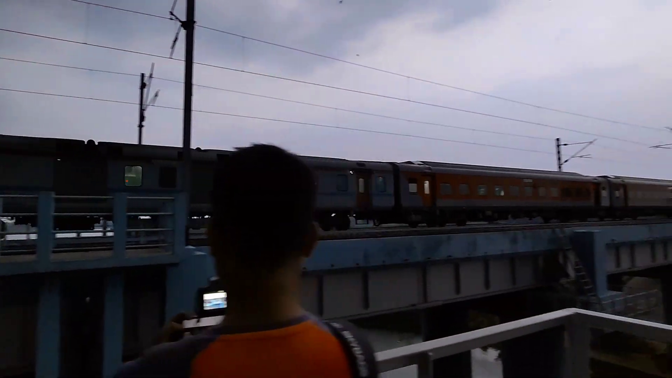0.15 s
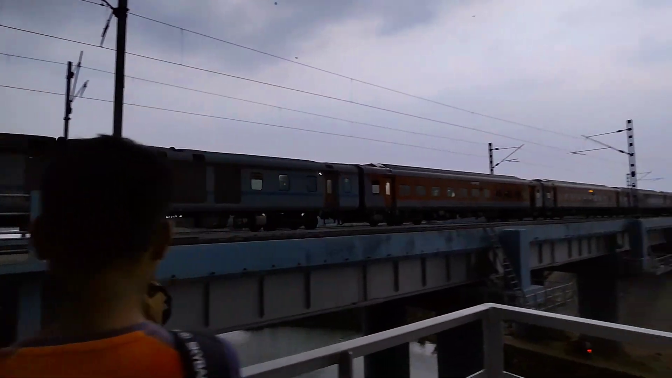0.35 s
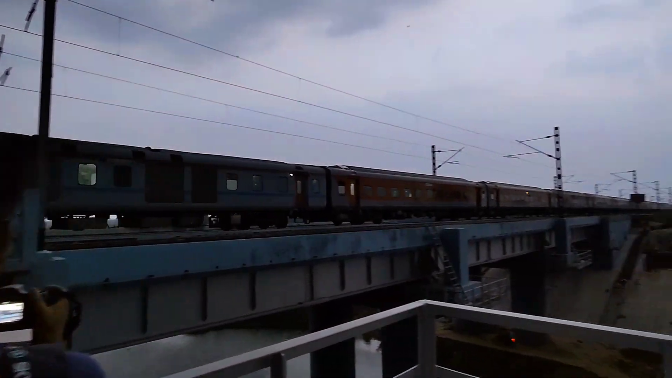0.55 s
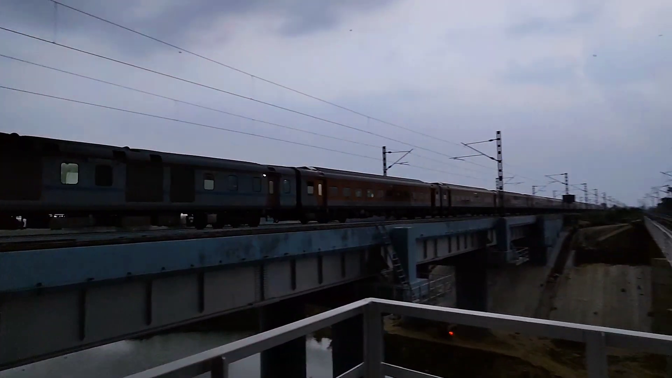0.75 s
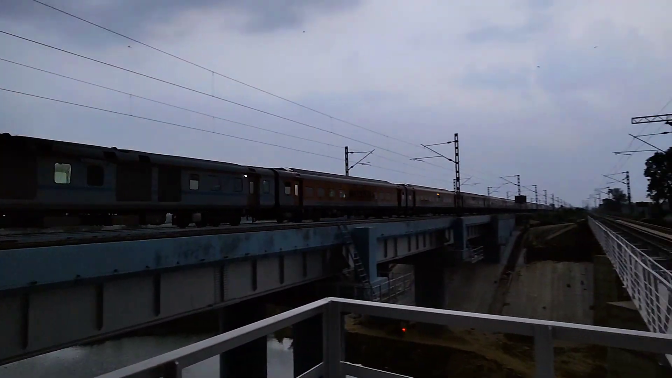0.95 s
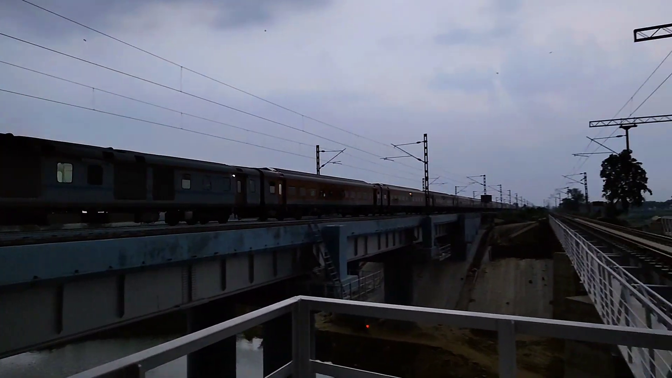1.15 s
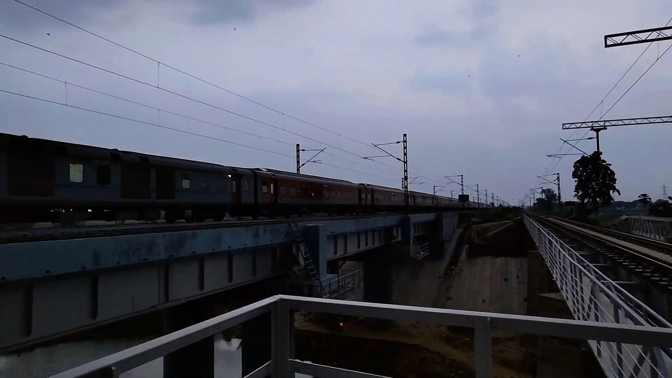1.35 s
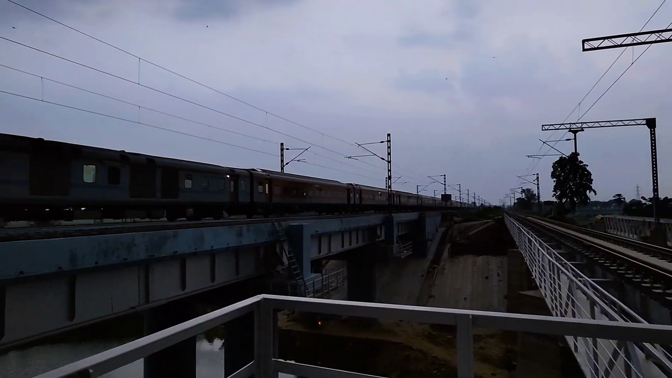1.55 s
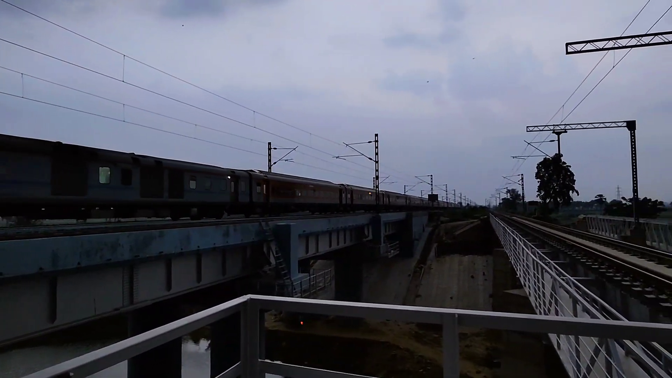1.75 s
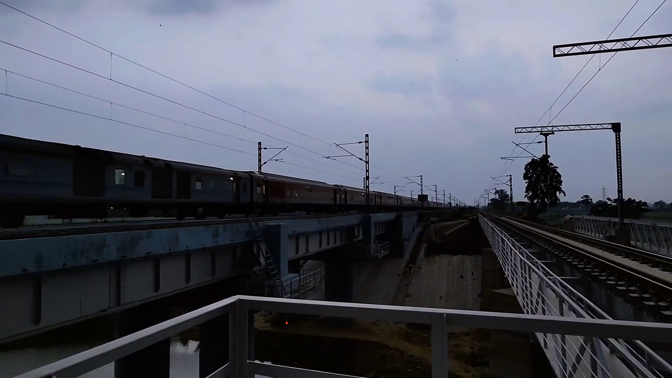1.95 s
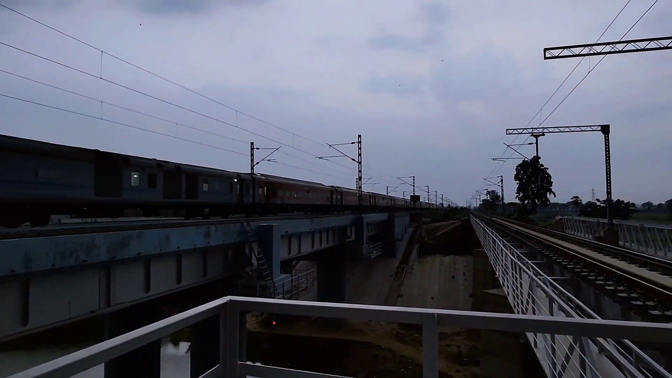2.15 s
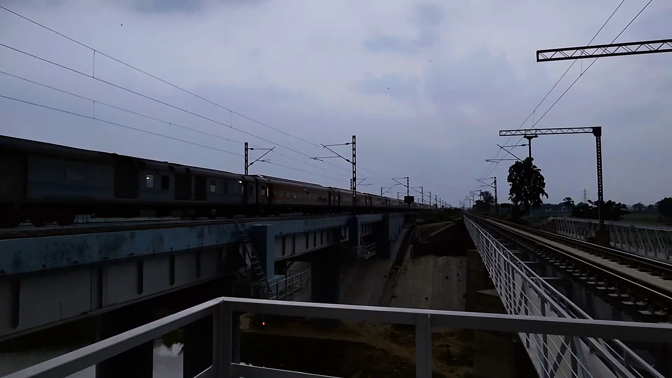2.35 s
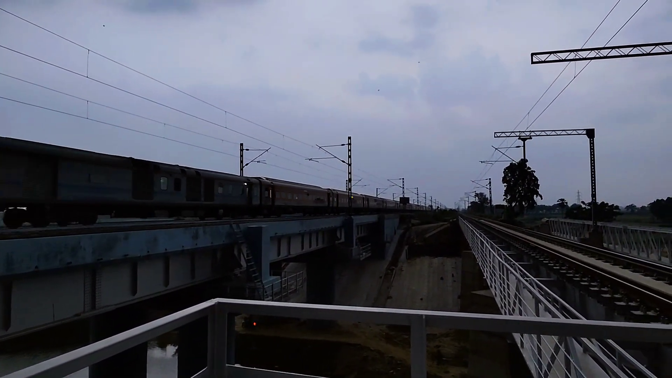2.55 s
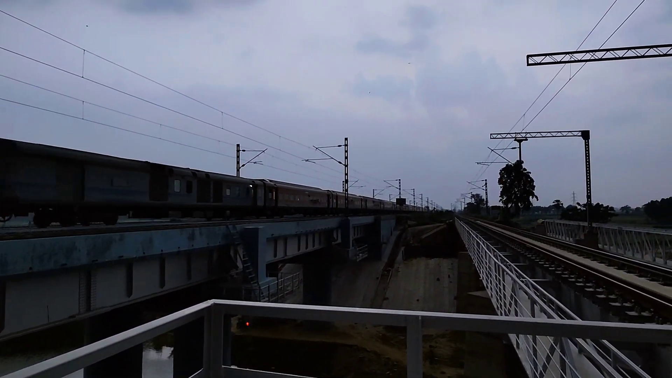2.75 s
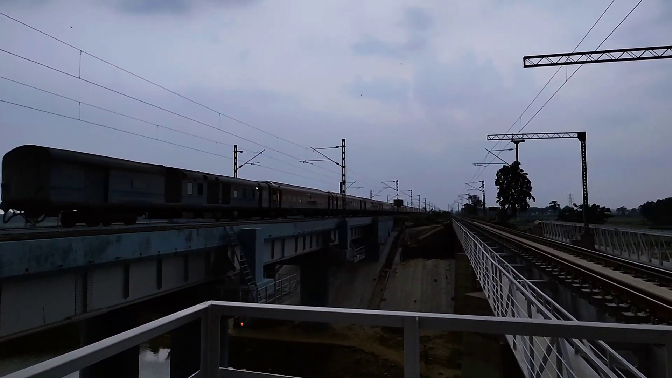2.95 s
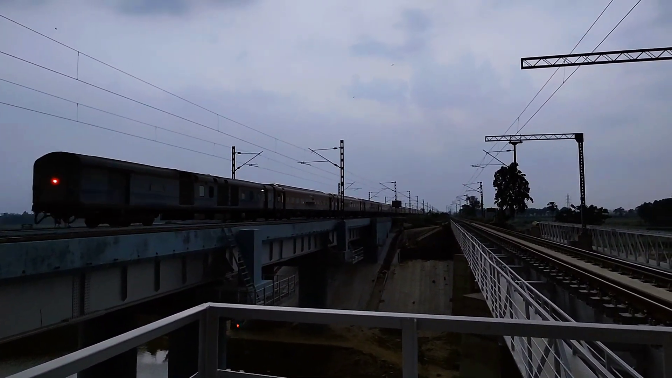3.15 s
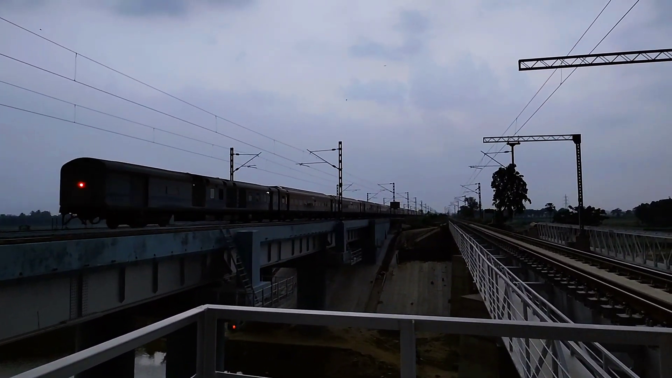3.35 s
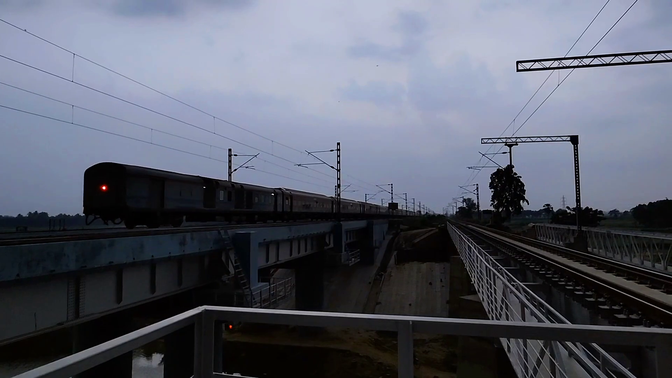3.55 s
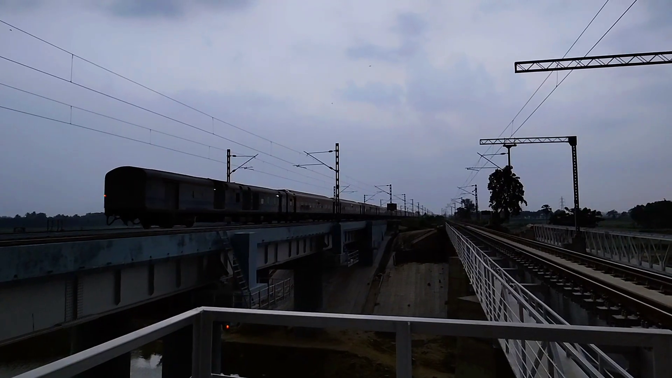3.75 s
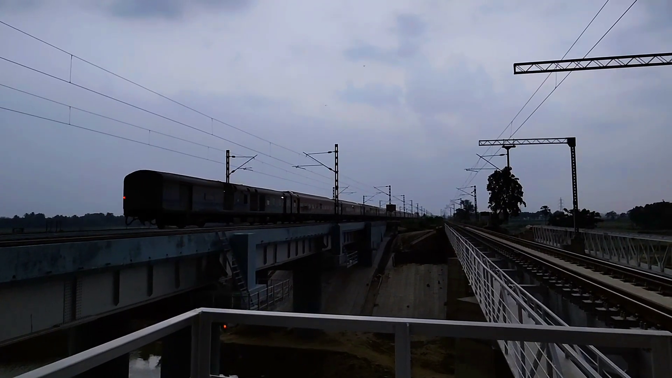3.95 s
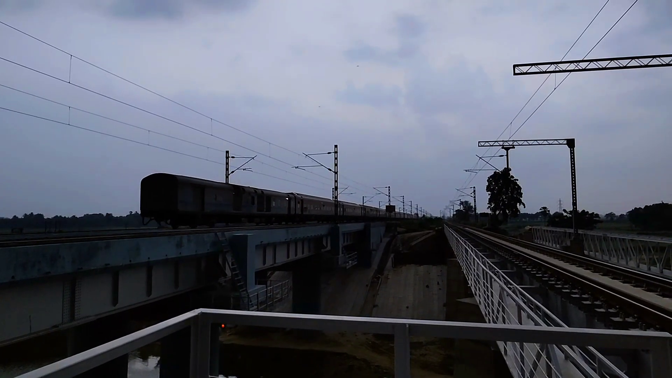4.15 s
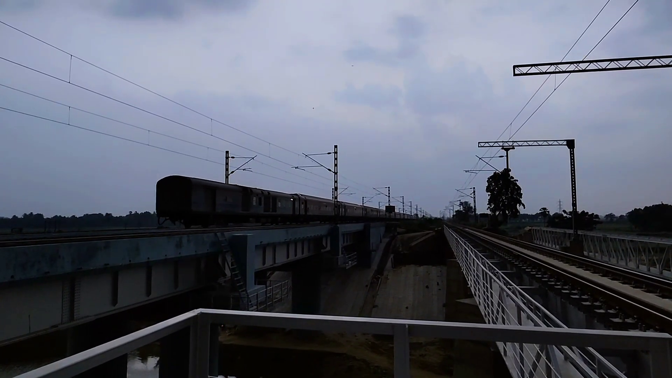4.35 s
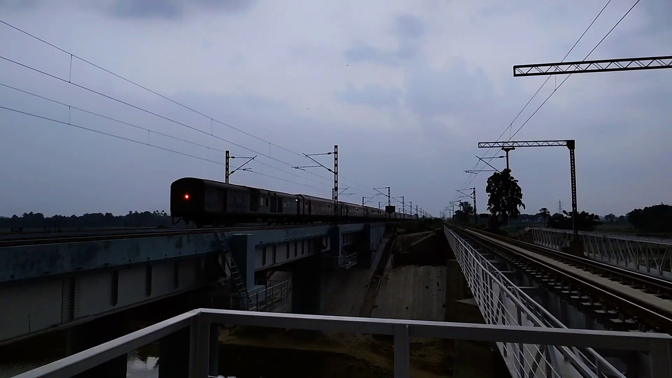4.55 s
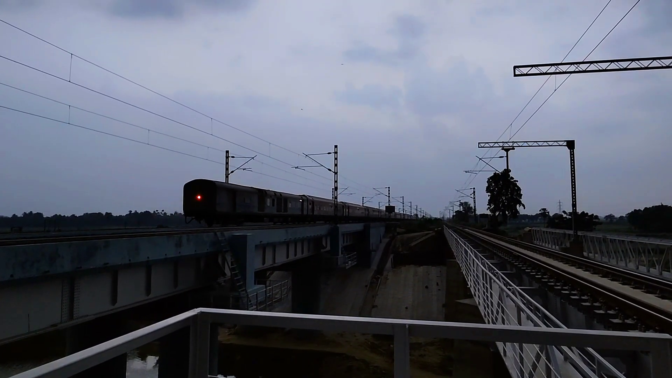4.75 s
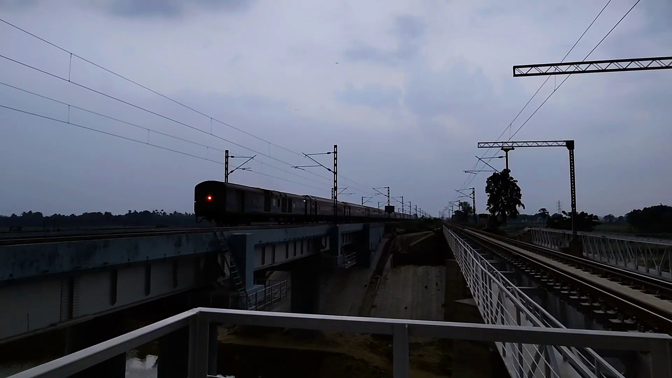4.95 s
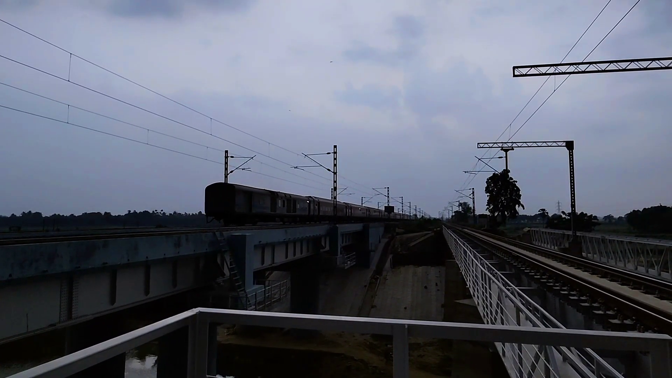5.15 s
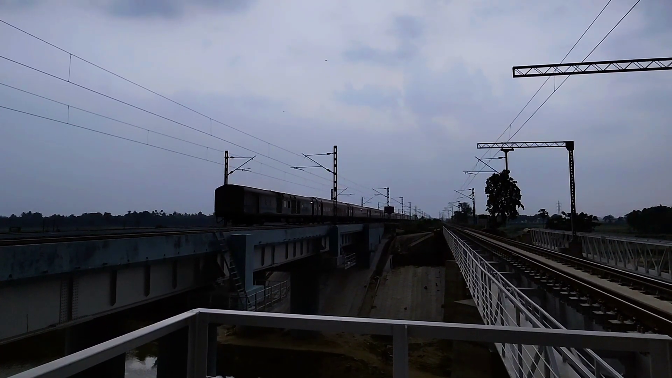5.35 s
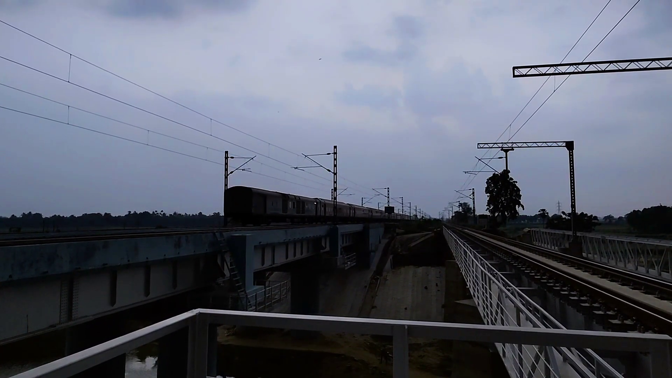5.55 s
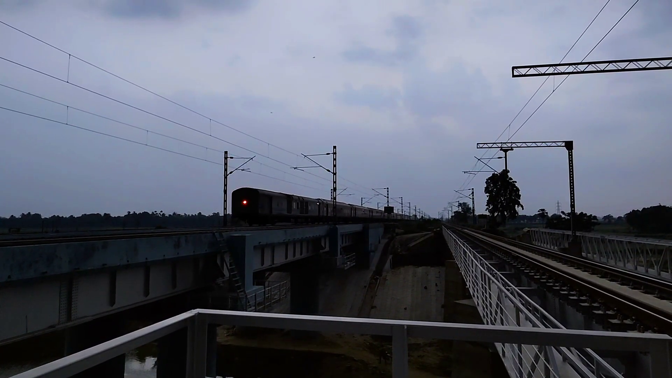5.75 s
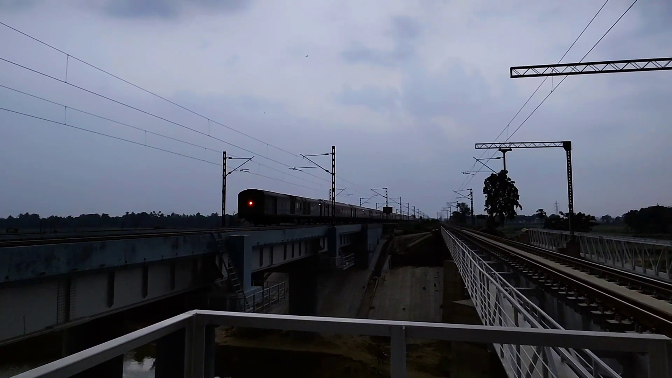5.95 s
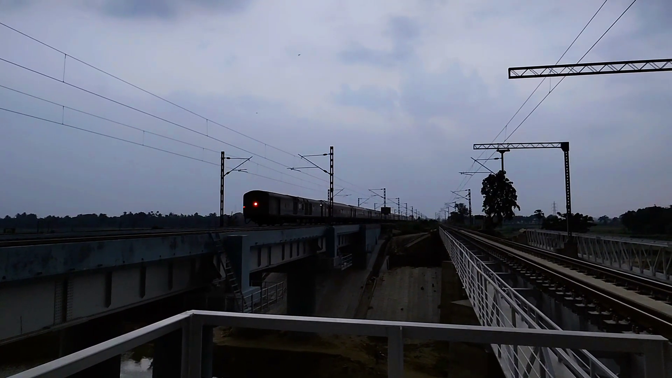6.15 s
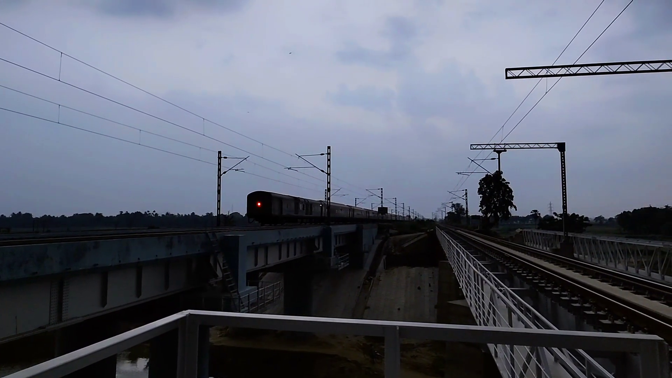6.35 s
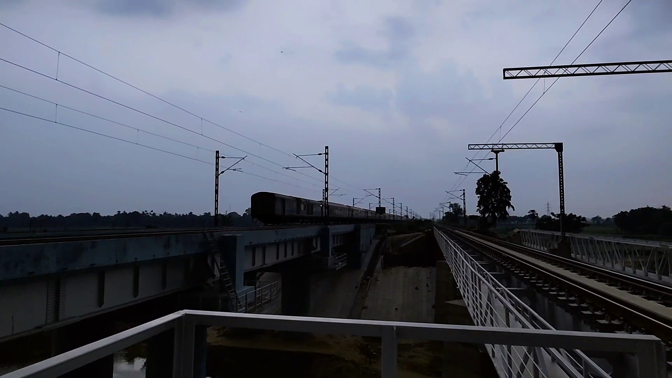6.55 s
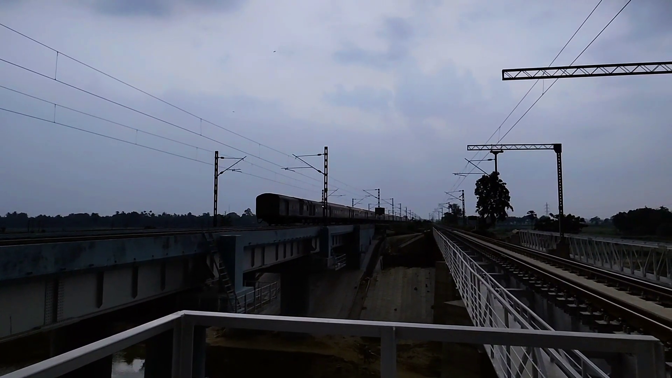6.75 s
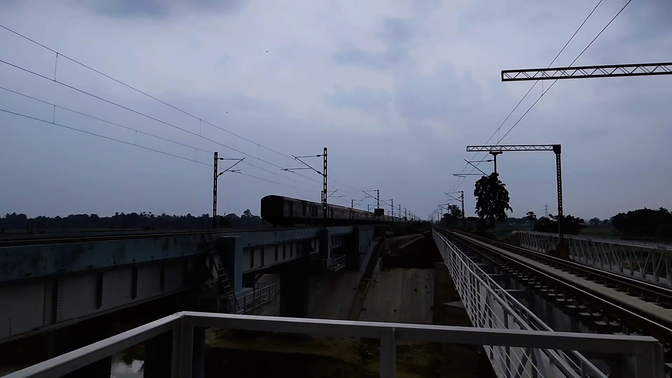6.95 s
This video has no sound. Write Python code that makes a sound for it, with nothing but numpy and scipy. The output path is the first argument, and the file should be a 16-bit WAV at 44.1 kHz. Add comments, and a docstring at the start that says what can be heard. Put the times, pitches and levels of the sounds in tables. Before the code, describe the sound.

From 0 to 2 seconds the end of a passenger train passes close on a steel girder bridge: heavy low rumble, rough rolling wheel noise with ringing rails, and a throbbing diesel generator drone around 75 hertz, rich in harmonics, with a thin turbo whistle and gritty high fizz. Light metal clanks come near 0.5 and 1.1 to 1.4 seconds. Around 2 seconds a dull double knock and drumming deck plates mark the last bogie, followed by ringing clanks near 2.3, 2.6, 3.0 and 3.7. A hollow colour glides downward around 2.8. From 3 seconds the train recedes leftward; wheels and fizz fade and the drone sinks slightly, wavering. From 4 to 7 seconds faint grainy ringing swells, like singing rails, rise over distant rumble. Soft low wind bumps touch the microphone, notably around 2 and 5.1 seconds. Wide outdoor stereo.

```python
"""The diesel of a generator car drones at the rear of a passenger train crossing a steel girder bridge,
heading left and away: firing harmonics and crank orders, under the thin whistle of a turbocharger.
Girders and deck rumble and drum as shaped noise; wheels roll as noise and ringing rail modes.
Running gear clanks in struck clusters of modes, grit fizzes and ticks, and ringing noise swells behind.
Light wind bumps the microphone as low noise."""
import sys
import numpy as np
from scipy import signal
from scipy.fft import rfft, irfft
from scipy.io import wavfile
from scipy.ndimage import uniform_filter1d

SR = 44100
rng = np.random.default_rng(int(sys.argv[2]) if len(sys.argv) > 2 else 0)


def transcribe(signal):
    """Save signal, clipped to [-1, 1], as a 16-bit WAV file at the path in sys.argv[1]."""
    frames = np.atleast_2d(signal).T
    limited = np.clip(frames, -1, 1)
    pcm = np.round(limited * 32767).astype(np.int16)
    wavfile.write(sys.argv[1], SR, pcm)


N = 308700
TIME = np.arange(N) / SR

# firing rate of the six-cylinder diesel, lowered by its motion away: (time [s], rate [Hz])
FIRING = [(0, 75.5), (.9, 75.34), (1.8, 74.46), (2.3, 74.37), (3.3, 73.72), (4.5, 73.9), (7, 73.5)]
# the other engine orders, relative levels: (multiple of crank speed [-], level [dB])
CRANK_ORDERS = [(4, -7), (7, -15), (8, -13), (10, -5.5), (12, -2.5), (13, 1.5), (14, -15), (15, -29),
                (16, -7.5), (17, -10), (19, -8.5), (20, -11.5), (22, -36), (23, -20), (25, -13.5)]
# direct sound and bridge echo add or cancel as the car moves; diesel() lifts each of these three curves.
# the firing tone: (time [s], level [dB])
FIRING_TONE = [(0.06, -21.5), (0.54, -20), (0.65, -22.5), (1.15, -22.5), (1.67, -26), (1.69, -25),
               (3.07, -21.5), (3.13, -26.5), (3.39, -21), (3.6, -24.5), (3.79, -23.5), (4.12, -28.5),
               (6.02, -25.5), (6.23, -32), (6.46, -32), (6.59, -36), (6.88, -25.5), (6.94, -30)]
# its octave: (time [s], level [dB])
FIRING_OCTAVE = [(0.06, -22.5), (0.23, -25), (0.31, -21), (1.61, -20.5), (1.78, -17.5), (1.92, -19.5),
                 (2.61, -20), (2.93, -28), (2.99, -21.5), (4.26, -20), (4.6, -28), (4.77, -48), (5.02, -26),
                 (5.69, -29.5), (6.15, -23), (6.25, -30.5), (6.31, -24.5), (6.94, -30)]
# its third harmonic: (time [s], level [dB])
FIRING_THIRD = [(0.02, -17.5), (0.13, -34), (0.25, -27), (0.35, -40), (0.42, -25.5), (1.15, -28),
                (1.21, -46), (1.29, -18.5), (1.37, -39.5), (2.02, -26.5), (2.12, -40), (2.14, -30.5),
                (3.16, -32), (3.24, -27), (4.65, -32), (6.94, -30)]
# swells of a narrow hum at the engine's thirteenth crank order: (time [s], level [dB], half length [s])
HUM_SWELLS = [(.18, -25, .11), (0.804, -24.5, 0.15), (1.26, -26, 0.073), (3.5, -31, 0.24),
              (4.48, -25.5, 0.068), (5.88, -28, .08)]

# colours of the noises, relative: (frequency [Hz], level per Hz [dB])
# girder rumble with the train abreast, and far off
GIRDERS_NEAR = [(25, -28), (42, -25), (56, -15.5), (100, 2), (190, -5), (240, 5), (290, -9), (350, 1.5),
                (450, -8), (680, -10.5), (850, -11), (1100, -21), (1500, -52), (2500, -70)]
GIRDERS_FAR = [(25, -31), (42, -26), (56, -12), (100, -4), (190, -1), (240, -3.5), (290, -5), (335, -3),
               (420, -5.5), (660, -9), (880, -17.5), (1100, -13), (1500, -36), (2500, -68)]
# drumming deck plates
DECK = [(200, -30), (380, -11), (470, 4.5), (600, -10), (800, -4.5), (950, -21), (1300, -12), (2500, -70)]
# rolling wheels, near and far
WHEELS_NEAR = [(600, -29), (1120, -8), (1480, 0), (2000, -5), (2300, -8.5), (2650, -7.5), (3100, -12),
               (3800, -11.5), (5000, -19), (6300, -21.5), (7400, -32), (10000, -38)]
WHEELS_FAR = [(600, -17), (1150, -3), (1500, 1.5), (2000, -6), (2300, -10), (2850, -12), (3200, -11),
              (3800, -11.5), (5000, -17.5), (6200, -21.5), (7400, -38), (10000, -45)]
# gritty fizz, near and far
FIZZ_NEAR = [(4000, -19), (6500, -23), (7500, -3), (8600, -6), (9700, 2), (10900, -2), (11700, 4),
             (12800, -3), (14200, -1.5)]
FIZZ_FAR = [(4000, -10), (6500, -27), (7400, -2.5), (8300, 2.5), (9600, 3.5), (10600, -1.5), (11700, 1.5),
            (12800, -5), (14200, -8)]
# wind at the microphone
WIND = [(15, 4), (35, -13), (60, 0), (120, 0), (300, -45), (1000, -100)]

# resonances of wheels and rails: (frequency [Hz], width [Hz], near level [dB], far level [dB])
RAIL_MODES = [(1127, 71, -48, -57), (1645, 120, -39.5, -58), (2075, 280, -45.5, -54),
              (2643, 104, -43.5, -56), (4210, 190, -57, -69), (5610, 69, -61, -65)]
# knocks of the running gear: (time [s], level [dB], ring [Hz], t60 [s])
CLANKS = [(.47, -38, 3500, .2), (1.075, -34, 1900, 0.17), (1.244, -30, 1707, 0.16), (1.41, -36, 1700, .13),
          (2.008, -26, 751.4, .06), (2.038, -23, 750, .06), (2.255, -35.5, 2580, 0.25),
          (2.56, -32, 2003, .42), (2.565, -38, 2800, .35), (3.03, -37, 1700, .26), (3.71, -34, 1482, .3)]
# the clearest dry ticks: (time [s], level [dB], frequency [Hz], width [Hz], t60 [s])
TICKS = [(1.035, -41, 10500, 1800, .12), (1.062, -40, 11650, 700, .08), (1.086, -33, 11700, 500, .04),
         (1.73, -38, 11600, 2500, .055), (2.498, -42, 10050, 3000, .07), (2.715, -43.5, 9800, 4000, .11),
         (2.845, -45, 11530, 5000, .12), (3.052, -44, 9000, 6000, 0.22), (3.173, -43, 10500, 5000, .085),
         (3.484, -43, 10460, 4000, 0.24), (4.783, -48, 8800, 4000, 0.13)]
# swells of narrow and broad ringing noise behind the train, some like singing rails:
# (time [s], level [dB], frequency [Hz], width [Hz], half length [s])
RINGING_SWELLS = [(4.75, -46, 1115, 110, 1.5), (4.79, -47.5, 3440, 560, 0.27), (5.1, -55, 5380, 2200, 0.52),
                  (5.3, -50.5, 2750, 600, .7), (5.616, -48.5, 3200, 150, .07),
                  (6.28, -45.5, 3300, 550, 0.14), (6.591, -46, 3270, 350, .045),
                  (6.795, -45, 3300, 380, .11)]
# wind bumps: (time [s], level [dB], half length [s])
BUMPS = [(1.578, -43, .04), (2.07, -40, .05), (2.73, -40, .03), (5.09, -38, 0.063), (5.19, -41, 0.034)]

# likeness of the two microphone ports with the train abreast: (frequency [Hz], likeness [0-1])
LIKENESS = [(60, 0.56), (250, 1), (500, 0.81), (700, 0.88), (950, 0.74), (1450, 0.9), (2100, 0.64),
            (2800, 0.44), (4000, 0.39), (6000, 0.21), (14000, 0.15)]
# left port over right port: (frequency [Hz], level difference [dB])
LEAN = [(60, -1), (110, 0), (200, -1), (370, -1), (670, 0.5), (1220, -1.3), (2240, -3.5), (4090, -1.5),
        (6000, -3.5), (8500, 0.5), (13700, -0.5)]
# bend of the left port's time lead over pitch: (frequency [Hz], factor on the lead [-])
LEAD_BEND = [(100, 0.54), (400, 1.03), (620, 0.73), (900, 1.02), (1400, 0.93), (2200, 1.11), (4000, 1.083)]

# train speed, distance of the track from the microphone, and when the last bogie is abreast
SPEED_M_PER_S, TRACK_M, TAIL_PASSES_S = 23.8, 16.6, 1.94


def gain_of(db):
    """Turns decibels into gain."""
    return 10 ** (np.asarray(db) / 20)


def evened(x):
    """Scales a signal to an rms of 1."""
    return x / np.sqrt(np.mean(x ** 2) + 1e-20)


def read(points, hz):
    """Reads a table over pitch, interpolating on a log-frequency axis."""
    f, value = np.transpose(points)
    return np.interp(np.log(hz + 1), np.log(f + 1), value)


def follow(rows):
    """Follows a (time, value) curve through the scene."""
    s, value = np.transpose(rows)
    return np.interp(TIME, s, value)


def swell(s, db, half_s):
    """A bell-shaped gain around time s."""
    return gain_of(db) * np.exp(-((TIME - s) / half_s) ** 2)


def wander(rate_hz):
    """Slow random drift of rms 1: noise low-passed around rate_hz."""
    count = N // 50
    hz = np.fft.rfftfreq(count, 50 / SR)
    spectrum = rfft(rng.standard_normal(count)) / (1 + (hz / rate_hz) ** 4)
    slow = evened(irfft(spectrum, count))
    return np.interp(TIME, np.linspace(0, TIME[-1], count), slow)


def nearness(passes_s, t=TIME):
    """Track distance over source distance: 1 until the source has passed, then falling."""
    return TRACK_M / np.hypot(TRACK_M, SPEED_M_PER_S * np.maximum(t - passes_s, 0))


def remoteness(t=TIME):
    """0 while coaches are abreast, towards 1 once the last bogie is far off."""
    return 1 - nearness(TAIL_PASSES_S, t) ** 2


def receding(db, passes_s, doubling_db):
    """Gain that holds until passes_s, then loses doubling_db with each doubling of distance."""
    return gain_of(db + doubling_db * np.log2(nearness(passes_s)))


def ring(hz, width_hz):
    """A noise-driven resonance of rms 1: slow filtered noise carried up to a fixed or gliding pitch."""
    r = np.exp(-np.pi * width_hz / SR)
    noise = rng.standard_normal(N) + 1j * rng.standard_normal(N)
    envelope = signal.lfilter([1], [1, -2 * r, r * r], noise)
    carrier = np.exp(2j * np.pi * np.cumsum(hz * np.ones(N)) / SR)
    return (envelope / envelope.real.std() * carrier).real


def ring_pair(hz, width_hz):
    """The same resonance twice, driven by unrelated noises."""
    return np.array([ring(hz, width_hz) for _ in range(2)])


def roar(near, far, patchy_db, flicker_db, size):
    """Two unrelated noises whose colour follows the distance, with drifting patches and shared flicker."""
    hop = size // 4
    frames, hz = N // hop + 5, np.fft.rfftfreq(size, 1 / SR)
    distance = remoteness(np.arange(frames) * hop / SR)[:, None]
    shape = gain_of((1 - distance) * read(near, hz) + distance * read(far, hz))
    shape /= np.linalg.norm(shape, axis=1, keepdims=True)  # distance alters colour, not level
    patches = uniform_filter1d(rng.standard_normal(shape.shape), size=14, axis=0)
    patches = evened(uniform_filter1d(patches, size=9, axis=1))
    flicker = evened(uniform_filter1d(rng.standard_normal((frames, 1)), size=6, axis=0))
    z = rng.standard_normal((2, *shape.shape)) + 1j * rng.standard_normal((2, *shape.shape))
    z *= shape * gain_of(patchy_db * patches + flicker_db * flicker)
    _, noise = signal.istft(z.transpose(0, 2, 1), nperseg=size, noverlap=size - hop)
    return evened(noise[:, :N])


def burst(s, db, hz, width_hz, t60, rise):
    """A blow that sets a cluster of close modes ringing, heard at both ports."""
    t, f = np.arange(SR // 2) / SR, np.fft.rfftfreq(SR // 2, 1 / SR)
    band = 1 / (1 + ((f - hz) / width_hz) ** 2) ** 2
    cluster = evened(irfft(rfft(rng.standard_normal((2, len(t)))) * band))
    envelope = np.exp(-np.log(1000) * t / t60) * (1 - np.exp(-t / rise))
    sound = gain_of(db) * cluster * envelope
    return np.pad(sound, ((0, 0), (round(s * SR), N)))[:, :N]


def echoes(depth, rate_hz):
    """Direct sound plus echoes off the steelwork that come and go, as a complex gain."""
    return 1 + depth * (wander(rate_hz) + 1j * wander(rate_hz))


def wind(breeze_db=-54, apart=0.55):
    """A light breeze and short low bumps of air, partly different at each port."""
    gusts = gain_of(breeze_db) + sum(swell(*row) for row in BUMPS)
    shared, differing = roar(WIND, WIND, patchy_db=2, flicker_db=2.5, size=2048)
    return gusts * evened(shared + apart * differing * np.array([[1], [-1]]))


def grit(ticks_per_s=3.1, over_fizz_db=3, t60_s=0.092):
    """A gritty fizz with faint ticks, random in time and strength, that lift it and die away."""
    fizz = roar(FIZZ_NEAR, FIZZ_FAR, patchy_db=2.6, flicker_db=-0.2, size=256)
    hits = (rng.random(N) < ticks_per_s / SR) * rng.random(N)
    ticks = signal.lfilter([1], [1, -np.exp(-np.log(1000) / (t60_s * SR))], hits)
    fade = receding(-50.5, passes_s=2.12, doubling_db=5.1)
    return fade * (1 + gain_of(over_fizz_db) * ticks) * fizz


def ringing(rough_db=1.5, rough_hz=40):
    """Grainy swells of narrow and broad ringing noise behind the train, some like singing rails."""
    swells = swell(6.46, db=-51, half_s=0.5) * ring_pair(3230, width_hz=500)  # fills in between
    for s, db, hz, width_hz, half_s in RINGING_SWELLS:
        swells += swell(s, db, half_s) * ring_pair(hz, width_hz)
    return swells * gain_of(rough_db * wander(rough_hz))


def knocks():
    """Clanks of the running gear and small dry ticks, each a struck cluster of modes."""
    clanks = sum(burst(s, db, hz, width_hz=760, t60=t60, rise=0.0013) for s, db, hz, t60 in CLANKS)
    return clanks + sum(burst(*row, rise=0.0023) for row in TICKS)


def turbo(cycles_per_firing=93.4):
    """The turbocharger whistles thinly, sinking in pitch with the engine as the car moves off."""
    whistle = ring_pair(cycles_per_firing * follow(FIRING), width_hz=28)
    return receding(-65, passes_s=2.8, doubling_db=7.16) * whistle


def wheels(revs_per_s=8.4, tread_db=0.36, surge_db=1.05):
    """Rough treads shake wheels and rails; the modes sink and fade as the last bogie leaves."""
    distance = remoteness()
    doppler = follow(FIRING) / FIRING[0][1]  # the modes share the engine's fall in pitch
    noise = roar(WHEELS_NEAR, WHEELS_FAR, patchy_db=1.47, flicker_db=1.05, size=1024)
    roll = receding(-33, passes_s=1.02, doubling_db=2.29) * noise
    for hz, width_hz, near_db, far_db in RAIL_MODES:
        mode_gain = gain_of(near_db + distance * (far_db - near_db))
        roll += mode_gain * ring_pair(hz * doppler, width_hz)
    # uneven treads swish once a turn
    swish_db = tread_db * np.sin(2 * np.pi * revs_per_s * TIME + wander(4.0))
    return roll * gain_of(swish_db + surge_db * wander(1.2))


def hollow(middle_s=2.8, middle_hz=422, sag_hz_per_s=50):
    """A hollow colour, as from a ground reflection, swells and glides down as the train moves off."""
    hz = middle_hz - sag_hz_per_s * (TIME - middle_s)
    return swell(middle_s, db=-34, half_s=1.0) * ring_pair(hz, width_hz=100)


def girders(turns, throb=0.21, surge_db=0.06):
    """The bridge rumbles under the wheels, throbbing with each firing, and the deck plates drum."""
    puffs = evened(1 + throb * np.cos(2 * np.pi * turns))
    rumble = puffs * roar(GIRDERS_NEAR, GIRDERS_FAR, patchy_db=1.0, flicker_db=0.83, size=2048)
    # the rumble carries little deep bass
    rumble = signal.sosfilt(signal.butter(2, 48, "highpass", fs=SR, output="sos"), rumble)
    rumble *= receding(-22, passes_s=1.71, doubling_db=2.1) * gain_of(surge_db * wander(1.85))
    # a bogie drums on the nearest deck plates
    drumming = roar(DECK, DECK, patchy_db=2, flicker_db=3, size=1024)
    return rumble + swell(1.84, db=-30.5, half_s=0.67) * drumming


def engine_hum():
    """Swells of a narrow noise-driven hum near 324 Hz, the engine's thirteenth crank order."""
    return sum(swell(*row) for row in HUM_SWELLS) * ring_pair(323.7, width_hz=25)


def diesel(turns, tone_lift_db=2.5, octave_lift_db=3.0, third_lift_db=2.5, tone_waver_db=1.0):
    """Each firing is a downward pressure pulse; unequal cylinders add orders of the crank speed."""
    tone_gain = gain_of(follow(FIRING_TONE) + tone_lift_db + tone_waver_db * wander(13))
    tone = tone_gain * np.cos(2 * np.pi * turns)
    octave_gain = gain_of(follow(FIRING_OCTAVE) + octave_lift_db + tone_waver_db * wander(15))
    octave = octave_gain * np.cos(4 * np.pi * turns)
    pipe_lag = 0.9  # radians
    third = (echoes(0.37, rate_hz=4.6) * np.exp(1j * (6 * np.pi * turns - pipe_lag))).real
    third *= gain_of(follow(FIRING_THIRD) + third_lift_db)
    orders = np.zeros(N)
    for order, db in CRANK_ORDERS:
        # six cylinders fire three times per crank turn
        spin = np.exp(2j * np.pi * (order * turns / 3 + rng.random()))
        orders += gain_of(db) * (echoes(0.68, rate_hz=1.88) * spin).real
    orders = receding(-29.5, passes_s=3.4, doubling_db=0.4) * evened(orders)
    return -(tone + octave + third + orders)


def ports(direct, scattered, lead_near_ms=0.41, lead_far_ms=0.21, scatter_hz=3500):
    """Sound from the left reaches the left port first; scattered treble differs between the ports."""
    hz, t, spectra = signal.stft(np.vstack([scattered, direct]), SR, nperseg=1024, noverlap=768)
    one, other, tone = spectra
    # far sound is less alike at the two ports, mostly above scatter_hz
    treble = hz ** 2 / (hz ** 2 + scatter_hz ** 2)
    same = np.clip(read(LIKENESS, hz), 0, 1)[:, None] ** (1 + np.outer(treble, remoteness(t)))
    lead_ms = lead_far_ms + (lead_near_ms - lead_far_ms) * nearness(TAIL_PASSES_S, t)
    lead_cycles = np.outer(hz * read(LEAD_BEND, hz), lead_ms) / 1000
    right = tone + same * one + np.sqrt(1 - same ** 2) * other
    right = right * np.exp(-2j * np.pi * lead_cycles)
    # an echo off the railing colours the two ports oppositely in the lower middle
    late = np.exp(-2j * np.pi * hz * 1.887 / 1000)  # 1.887 ms
    share = 0.27 * np.exp(-(np.log2((hz + 1) / 840) / 0.98) ** 2)  # centred on 840 Hz, 0.98 octaves
    echo = (share * late)[:, None]
    lean = gain_of(read(LEAN, hz) / 2)[:, None]
    pair = np.array([(tone + one) * lean * (1 + echo), right / lean * (1 - echo)])
    return signal.istft(pair, nperseg=1024, noverlap=768)[1][:, :N]


def scene():
    """Wind, grit, running gear, bridge and engine, with the train placed at the two ports."""
    firing_hz = follow(FIRING) * (1 + 0.0018 * wander(2.54))  # the engine speed hunts slightly
    turns = np.cumsum(firing_hz) / SR  # counted in firings
    scattered = grit() + ringing() + knocks() + turbo() + wheels()
    scattered += hollow() + girders(turns) + engine_hum()
    return wind() + ports(diesel(turns), scattered)


def record(dry):
    """A steep low-pass limits the band to 14.3 kHz."""
    lowpass = signal.firwin(511, 14300, window=("kaiser", 9), fs=SR)
    return signal.oaconvolve(dry, lowpass[None], "same")


dry = scene()
out = record(dry)
transcribe(out)
```